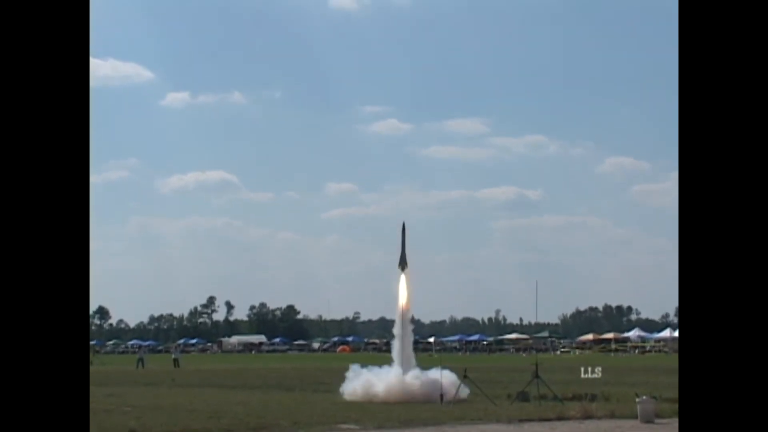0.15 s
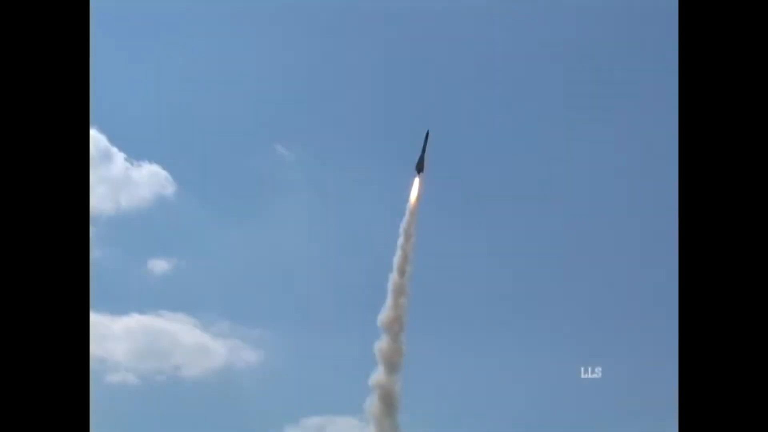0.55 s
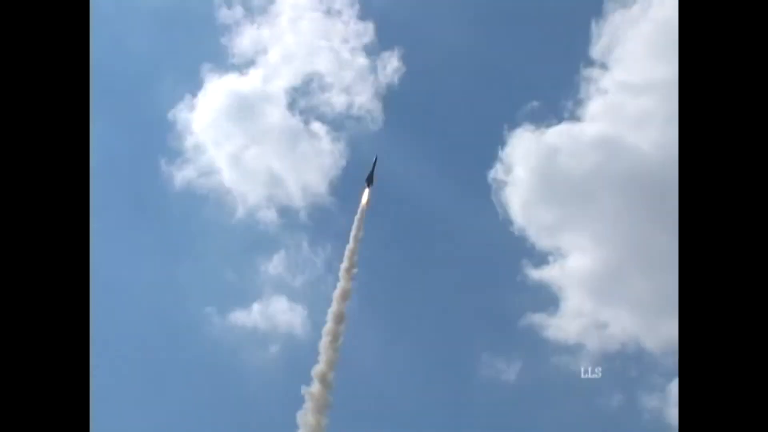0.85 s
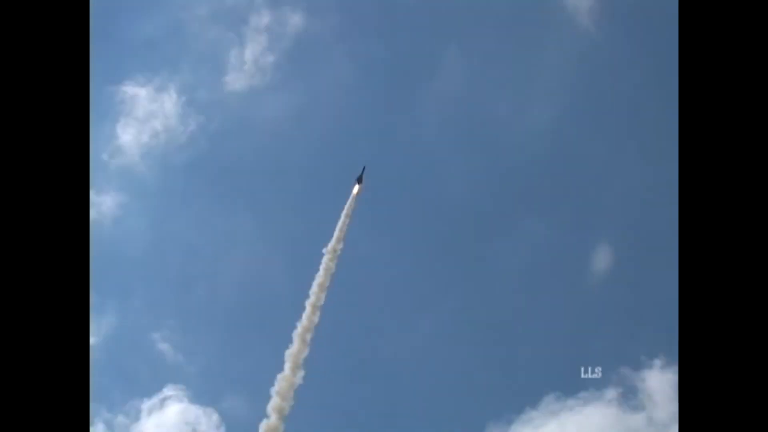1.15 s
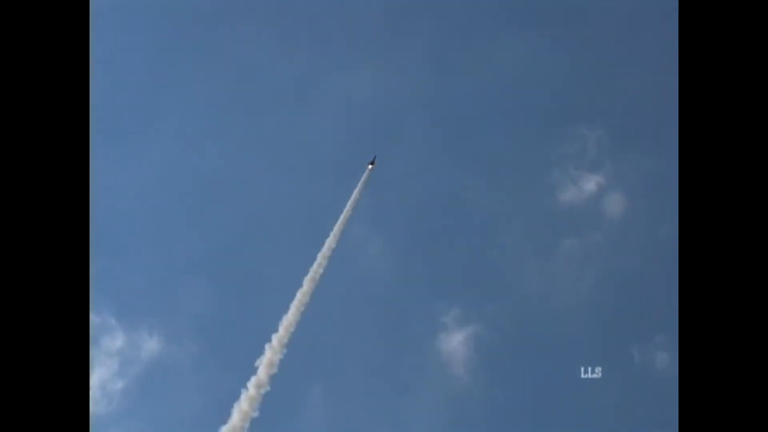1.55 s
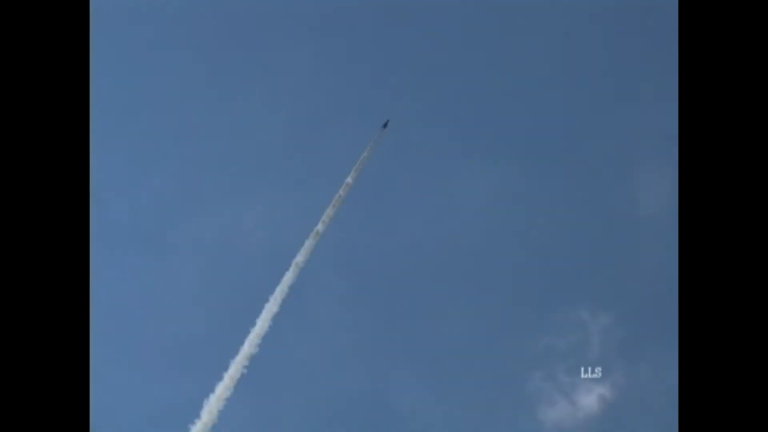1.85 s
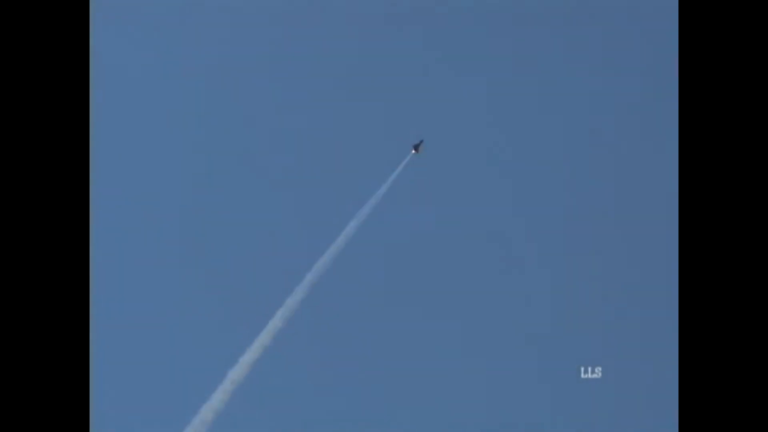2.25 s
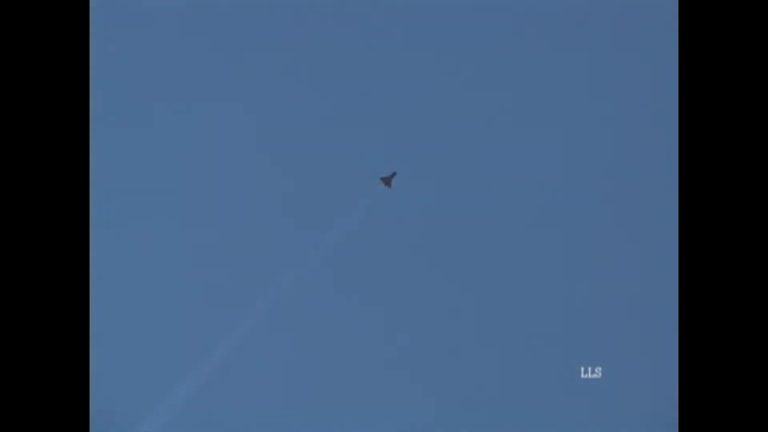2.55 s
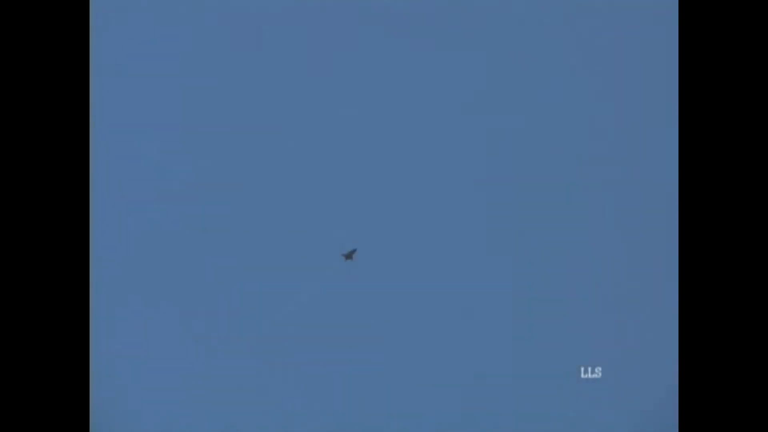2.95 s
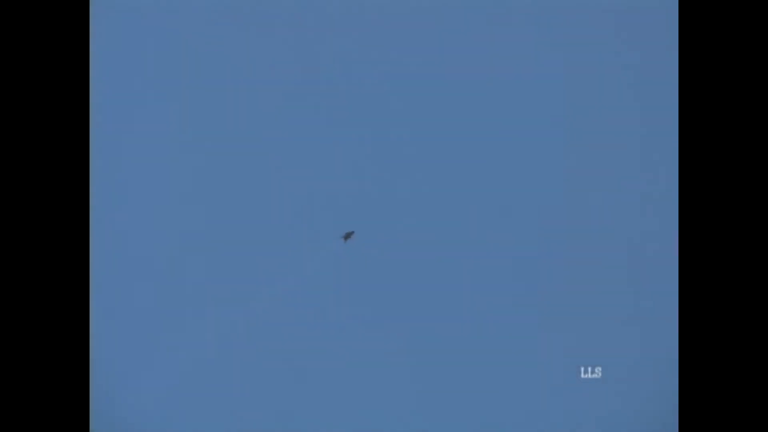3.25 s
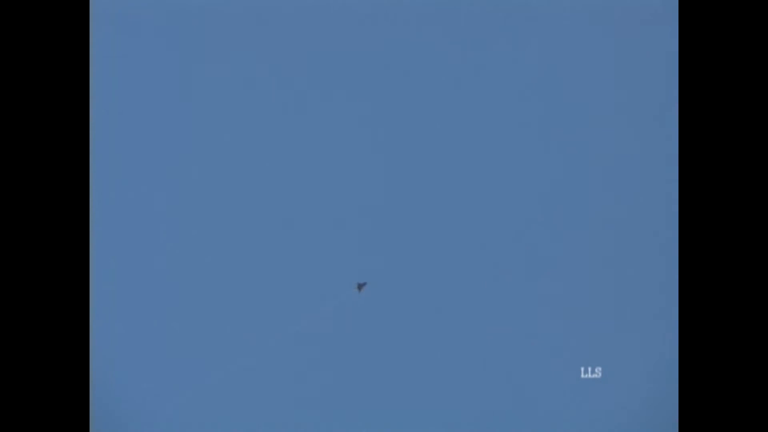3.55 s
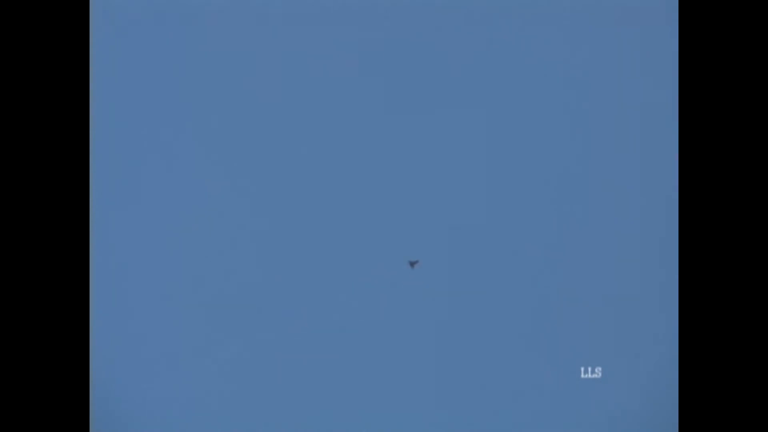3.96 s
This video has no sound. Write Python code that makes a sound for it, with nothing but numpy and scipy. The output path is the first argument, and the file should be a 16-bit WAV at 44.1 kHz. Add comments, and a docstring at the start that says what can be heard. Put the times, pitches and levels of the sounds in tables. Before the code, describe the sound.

A camera microphone outdoors catches a rocket launch: a bang, then a dense tearing jet blast with bright hiss and crackle, overloading at its loudest. The tone turns darker and less hissy as the rocket rises. The motor tails off after about 1.8 seconds, sputtering in separate pops with small echoes. Afterwards it is nearly quiet: a thin, slowly sinking whistle, soft air rush, faint field rumble and light handling knocks.

```python
"""A high-power rocket lights with a bang, roars off its pad and climbs over an open field.
Its jet is noise shaped by thrust and direction, mixed with shocks, that overloads a camera microphone.
The ground reflects the jet a little later as the rocket rises, so a comb sweeps down through the roar.
The motor sputters out in separate pops, some echoed, each an N-wave; the coasting rocket hisses and whistles.
The field is faint coloured noise, and light knocks on the camera are short damped rings."""
import sys
import numpy as np
from scipy import signal
from scipy.fft import rfft, irfft, next_fast_len
from scipy.io import wavfile
from scipy.ndimage import map_coordinates

SR = 44100
rng = np.random.default_rng(int(sys.argv[2]) if len(sys.argv) > 2 else 0)


def master_out(mix):
    """Clip the mix to full scale and print it as 16-bit PCM to the path in sys.argv[1]."""
    frames = np.transpose(np.atleast_2d(mix))
    ceiling = np.clip(frames, -1, 1)
    pcm = np.round(ceiling * 32767).astype(np.int16)
    wavfile.write(sys.argv[1], SR, pcm)


N = 180809
TIME = np.arange(N) / SR  # seconds
# short-time spectra: frames of 512 samples, one every 128
FRAME_S = np.arange(N // 128 + 3)[:, None] * 128 / SR
BIN_HZ = np.fft.rfftfreq(512, 1 / SR)

# The motor's drive: igniter, pressure building, full burn, tail-off, smouldering.
# Each row: time in seconds, level in dB re full burn.
THRUST = [(0, -96), (.056, -77.5), (.068, -25.5), (.13, -21.5), (.19, 0), (.35, -2.5), (.6, -0.5),
          (1.18, -2.5), (1.47, 0.5), (1.53, 0), (1.83, -5.5), (1.96, -8), (2.08, -25.5), (2.19, -19),
          (2.25, -33), (2.55, -37), (2.63, -55), (3.1, -100)]
# Coherence of the rocket's sound at the two microphone ports.
# Each row: frequency in Hz, left-right likeness (0 to 1).
JET_SAME = [(60, 0.41), (150, 0.95), (500, 1), (1000, 1), (2400, 0.88), (6000, 0.9), (9000, 0.83),
            (15000, 0.57)]

# the climb: steady acceleration from a pad some way off
PAD_DISTANCE_M, START_HEIGHT_M, LIFTOFF_S, ACCELERATION_M_PER_S2 = 40, 2.264, 0.1, 78.26
MIC_HEIGHT_M, SOUND_M_PER_S = 2.045, 343
# the roar is beamed backwards: it grows and deepens as the nozzle turns toward the listener
ROAR_DB, ROAR_BEAM_DB = -16.5, 8
SIDE_ON_PITCH, TAIL_ON_PITCH = 1.605, 0.93  # factors on the roar's frequencies
# a weaker jet is deeper too, down to a limit
THRUST_DB_PER_OCTAVE, DEEPEST_THRUST_DB = 39, -27
# the hiss follows only a share of the thrust's swing in dB, and is weaker and duller from behind
HISS_DB, HISS_BEAM_DB, HISS_THRUST_SHARE = -11, -5.5, 0.49
SIDE_ON_TREBLE_DB, TAIL_ON_TREBLE_DB = 2.5, -4
# tilt of the hiss's low end: side on, from behind, and (from behind) its loss per dB of fading thrust
SIDE_ON_BODY_DB, TAIL_ON_BODY_DB, BODY_PER_THRUST = -1, 3, 0.17
FLARE_LEVEL_SHARE = 0.76  # share of a flare that lifts the whole hiss; the treble is lifted further
CHUFF_RISE_S = 0.0021
FIELD_DB = -56  # before slow swells
CUTOFF_HZ = 15700


def gain_of(db):
    """Level to amplitude: 20 dB is a factor of ten in pressure."""
    return 10 ** (np.asarray(db) / 20)


def evened(x):
    """Normalises mean-square pressure: scales to rms 1."""
    return x / np.sqrt(np.mean(x ** 2) + 1e-20)


def read(points, hz):
    """Spectral interpolation: straight lines on a log-frequency axis."""
    f, value = np.transpose(points)
    return np.interp(np.log(hz + 1), np.log(f + 1), value)


def follow(rows, t, column=1):
    """Linear interpolation in time of one column of a curve."""
    rows = np.asarray(rows)
    return np.interp(t, rows[:, 0], rows[:, column])


def add(mix, s, sound):
    """Superposition: adds a sound to the mix, starting at s seconds."""
    part = mix[max(round(s * SR), 0):][:len(sound)]
    part += sound[:len(part)]


def filtered(x, response):
    """Linear filtering: multiplies the spectrum by a function of frequency."""
    size = next_fast_len(N + SR // 2)
    spectrum = rfft(x, size) * response(np.fft.rfftfreq(size, 1 / SR))
    return irfft(spectrum, size)[..., :N]


def lowpass(x, hz, order=2):
    """Causal Butterworth low-pass: maximally flat below its corner."""
    sections = signal.butter(order, min(hz, 0.45 * SR), fs=SR, output="sos")
    return signal.sosfilt(sections, x)


def pair(same):
    """Partial coherence: white noise at two ports, sharing one part and differing in the rest."""
    left, other = rng.standard_normal((2, N))
    likeness = lambda hz: np.clip(read(same, hz), 0, 1)
    shared = filtered(left, likeness)
    separate = filtered(other, lambda hz: np.sqrt(1 - likeness(hz) ** 2))
    return np.array([left, shared + separate])


def coloured(x, db, band):
    """Time-varying filtering: noise takes a moving spectrum (frames x bins, dB), rms 1 inside the band."""
    gain = gain_of(db)
    inside = (BIN_HZ >= band[0]) & (BIN_HZ <= band[1])
    gain = gain / np.sqrt(np.mean(gain ** 2 * inside, axis=1, keepdims=True))
    z = signal.stft(x, nperseg=512, noverlap=384)[2]
    shaped = z * gain[:z.shape[-1]].T
    return signal.istft(shaped, nperseg=512, noverlap=384)[1][:, :N]


def wander(hz):
    """Band-limited random modulation: low-passed noise of rms 1, falling off steeply above hz."""
    return evened(filtered(rng.standard_normal(N), lambda f: 1 / (1 + (f / hz) ** 4)))


def placed(x, side):
    """Interaural level difference: side is left minus right in dB, frequency by frequency."""
    return filtered(x, lambda hz: gain_of(np.outer([0.5, -0.5], read(side, hz))))


def field(swell_db=2.0):
    """Ambient noise: random pressure, spectrally shaped, is the faint rumble and hiss of the open field."""
    # Each row: frequency in Hz, relative spectral level in dB.
    field_colour = [(12, -21.5), (25, -9), (80, -4), (140, -9.5), (220, -11.5), (350, -16.5), (550, -16),
                    (1100, -14.5), (1400, -21), (2000, -21), (3500, -33.5), (6000, -37.5), (15500, -40)]
    # Each row: frequency in Hz, left-right likeness (negative counts as 0).
    field_same = [(60, 0.43), (180, 0.21), (550, 0.22), (1650, 0.42), (4970, 0.43), (15000, -0.03)]
    # Each row: frequency in Hz, left minus right in dB.
    field_side = [(60, -0.5), (180, -1), (550, -4), (1650, -1), (4970, 0.5), (15000, -0.5)]
    air = evened(filtered(pair(field_same), lambda hz: gain_of(read(field_colour, hz))))
    return placed(air, field_side) * gain_of(FIELD_DB + swell_db * wander(hz=10))


def flight(t):
    """Spherical spreading: sine of the rocket's elevation, and its distance loss in dB re the pad."""
    height = START_HEIGHT_M + ACCELERATION_M_PER_S2 * np.maximum(t - LIFTOFF_S, 0) ** 2 / 2
    distance = np.hypot(height, PAD_DISTANCE_M)
    return height / distance, 20 * np.log10(distance / PAD_DISTANCE_M)


def turned(t, side_on, tail_on, power):
    """Directivity: moves between two values as the climbing rocket turns its nozzle toward the listener."""
    return side_on + (tail_on - side_on) * flight(t)[0] ** power


def turbulence(share, per_s):
    """Jet mixing noise: white noise at both ports, with a share of its power in separate shocks."""
    shocks = (rng.random(N) < per_s / SR) * rng.uniform(0.5, 1, N)
    shocks = -signal.hilbert(shocks).imag  # each one pushes, then pulls
    share = np.clip(share, 0, 1)
    return np.sqrt(1 - share) * pair(JET_SAME) + np.sqrt(share) * evened(shocks)


def chuffs():
    """Unsteady mass flow: power of gas puffs that each rise quickly, hold and decay exponentially."""
    # Puffs as the motor lights and as it burns out.
    # Each row: start in seconds, hold in seconds from the start, level in dB, t60 in seconds.
    chuff_rows = [(0, 0.073, -49.5, .1), (.066, .008, -12.5, 0.17), (0.084, 0.012, -8.5, 1.11),
                  (1.99, .135, -25.5, 0.059), (2.414, 0.013, -45, 0.11), (2.658, 0.013, -51.5, 1.24)]
    power = np.zeros(N)
    for start, hold, db, t60 in chuff_rows:
        age = TIME - start
        rise = np.clip(age / CHUFF_RISE_S, 0, 1)
        power += (rise * gain_of(db - 60 * np.maximum(age - hold, 0) / t60)) ** 2
    return power


def roar(shocks_per_s=420, flutter_db=0.34):
    """Large-eddy jet noise: turbulence and shocks whose spectrum shifts with thrust and direction."""
    # Crackle of the jet. Each row: time in seconds, share of the drive's power in shocks (0 to 1).
    crackle_share = [(0, 0.57), (.3, 0.28), (1.4, 0), (1.8, 0.55), (2.1, 0.72), (2.25, 0.01), (2.8, 0.32)]
    # Each row: frequency in Hz before the pitch factor, relative spectral level in dB.
    roar_colour = [(20, -29.5), (70, -30), (130, -15.5), (200, -13), (350, -4), (550, 1.5), (850, 1.5),
                   (1250, -2.5), (1800, -6.5), (2800, -15), (5000, -32), (12000, -78)]
    # Slow swells of the roar. Each row: time in seconds, change of level in dB.
    roar_swell = [(.28, 0), (.38, 3), (.5, 1), (.57, -3.5), (.73, -3.5), (.78, 0), (1.05, 2.5), (1.48, -1),
                  (1.9, -1)]
    drive = turbulence(follow(crackle_share, TIME), shocks_per_s)
    octaves = np.maximum(follow(THRUST, FRAME_S), DEEPEST_THRUST_DB) / THRUST_DB_PER_OCTAVE
    pitch = turned(FRAME_S, SIDE_ON_PITCH, TAIL_ON_PITCH, power=1.7) * 2 ** octaves
    jet = coloured(drive, read(roar_colour, BIN_HZ / pitch), band=(200, 1500))
    beam_db = turned(TIME, 0, ROAR_BEAM_DB, power=1.2)
    burn_db = ROAR_DB + follow(THRUST, TIME) + beam_db - flight(TIME)[1]
    strength = np.sqrt(gain_of(burn_db) ** 2 + chuffs())  # powers add
    return jet * strength * gain_of(follow(roar_swell, TIME) + flutter_db * wander(hz=35.2))


def flares(t):
    """Amplitude modulation: brief Gaussian rises of the hiss, in dB at the times t."""
    # Each row: time of the top in seconds, time to fall to 1/e in seconds, height in dB.
    flare_rows = [(0.235, 0.023, 2.5), (0.417, 0.02, 2.5), (0.522, 0.015, 2), (0.707, 0.065, 2.5),
                  (1.316, 0.014, 3.5), (1.443, 0.022, 4), (1.555, .012, 2.5), (1.957, 0.0085, 2.5),
                  (2.178, 0.026, 1)]
    return sum(db * np.exp(-((t - s) / half) ** 2) for s, half, db in flare_rows)


def hiss(flutter_db=0.73, knee_hz=5000, treble_hz=8200, shimmer_db=0.58, body_hz=2200,
         steepness=0.8, crackle=0.11, shocks_per_s=800):
    """Fine-scale jet noise: small eddies radiate high, with less treble as the nozzle turns to the listener."""
    # Each row: frequency in Hz, relative spectral level in dB.
    hiss_colour = [(300, -29.5), (900, -11.5), (1600, -2), (2100, -2), (2400, -1), (2850, 3), (3450, -3),
                   (4300, -1), (5500, -6), (7000, -12.5), (8800, -17), (10500, -26.5), (15500, -40.5)]
    # 0 up to the knee, 1 at the treble frequency, more above it
    reach = (np.maximum(BIN_HZ - knee_hz, 0) / (treble_hz - knee_hz)) ** steepness
    shimmer = flares(FRAME_S) + shimmer_db * np.interp(FRAME_S, TIME, wander(hz=21.88))
    treble_db = turned(FRAME_S, SIDE_ON_TREBLE_DB, TAIL_ON_TREBLE_DB, power=2.1)
    air_db = np.minimum(treble_db * reach, 5) + shimmer * np.minimum(reach, 1)
    tail_body_db = TAIL_ON_BODY_DB + BODY_PER_THRUST * follow(THRUST, FRAME_S)
    low_db = turned(FRAME_S, SIDE_ON_BODY_DB, tail_body_db, power=3.3)
    colour_db = read(hiss_colour, BIN_HZ) + air_db + low_db / (1 + (BIN_HZ / body_hz) ** 6)
    jet = coloured(turbulence(crackle, shocks_per_s), colour_db, band=(2500, 6000))
    beam_db = turned(TIME, 0, HISS_BEAM_DB, power=1.4)
    burn_db = HISS_DB + HISS_THRUST_SHARE * follow(THRUST, TIME) + beam_db - flight(TIME)[1]
    return jet * gain_of(burn_db + FLARE_LEVEL_SHARE * flares(TIME) + flutter_db * wander(hz=59))


def pops(edge_hz=2700):
    """N-wave: a jump in pressure, a ramp down into suction, and a jump back, with softened edges."""
    # Single shocks from the motor, with some late echoes of the pops near 2.43 s.
    # Each row: start in seconds, jump in dB before the edges are softened, length in milliseconds.
    shock_rows = [(0.069, 1, 1.8), (0.0743, 7, 0.69), (0.0733, -7, 3.6), (.109, -8.5, 4.3),
                  (1.4875, -0.5, 1.2), (2.095, -17, 1.3), (2.157, -15.5, 1.2), (2.1634, -22, 0.72),
                  (2.179, -15, 0.75), (2.1825, -20, 0.52), (2.19, -14.5, 1.16), (2.227, -17, 1.1),
                  (2.415, -24.5, 0.78), (2.4254, -25, 1.15), (2.4369, -38, 1), (2.4485, -33, 0.81),
                  (2.461, -34, 1.6), (2.6605, -34, 0.91)]
    out, t = np.zeros(N), np.arange(SR // 40) / SR
    for s, db, ms in shock_rows:
        u = t * 1000 / ms  # 0 to 1 along the wave
        add(out, s, gain_of(db) * (1 - 2 * u) * (u < 1))
    return lowpass(out, edge_hz)


def ignition(start_s=0.078, db=-14, t60=0.1, top_hz=280, bottom_hz=150):
    """Impinging flow: the first gas hits the blast plate with a short boom of decaying low noise."""
    age = TIME - start_s
    boom = lowpass(rng.standard_normal(N), top_hz)
    boom = filtered(boom, lambda hz: hz ** 2 / (hz ** 2 + bottom_hz ** 2))
    return evened(boom) * (age > 0) * gain_of(db - 60 * abs(age) / t60)


def over_ground(x, reflection=0.53, grass_hz=2900, full_lag_s=0.0033):
    """Two-path interference: a duller bounce off the grass, weak while the rocket is low, later as it rises."""
    lag_s = 2 * MIC_HEIGHT_M * flight(TIME)[0] / SOUND_M_PER_S
    dulled = filtered(x, lambda hz: 1 / np.sqrt(1 + (hz / grass_hz) ** 4))
    bounce = np.array([map_coordinates(side, [(TIME - lag_s) * SR], order=3) for side in dulled])
    return x + reflection * np.minimum(lag_s / full_lag_s, 1) * bounce


def housing(hz):
    """Resonance and phase lead: the ports' fixed ripples for sound from the sky; the left hears it first."""
    # Peaks and dips of the microphone housing.
    # Each row: centre in Hz, width in Hz, height of this one peak or dip in dB.
    ripples = [(170, 70, 2), (520, 70, 2), (620, 90, -1.5), (1250, 160, 2.5), (1480, 160, -2.5),
               (1690, 150, 3), (2330, 180, 2), (2600, 160, -2), (3250, 200, 1.5), (3880, 160, 2),
               (4570, 200, 1.5), (5120, 200, -2), (6860, 160, 2.5), (7950, 300, -2.5)]
    # Each row: frequency in Hz, radians by which the left leads.
    jet_phase = [(20, 0.02), (500, 0.4), (1200, 0.28), (2400, 0.42), (6000, .1), (10000, .3), (15000, 0.17)]
    ripple_db = sum(db / (1 + (2 * (hz - centre) / width) ** 2) for centre, width, db in ripples)
    return gain_of(ripple_db) * np.exp(1j * np.outer([0.5, -0.5], read(jet_phase, hz)))


def coast(waver=0.00178, unsteady=0.48, unsteady_hz=40):
    """Aeolian tone: an edge on the rocket whistles in rushing air; the pitch sinks as it slows."""
    # Air over the coasting rocket, levels before the microphone's response.
    # Each row: time in seconds, whistle pitch in Hz, whistle level in dB, rush level in dB.
    air_rows = [(2.2, 2748, -66, -56), (2.5, 2563, -59, -60), (2.82, 2440, -66.5, -63.5),
                (3.06, 2400, -62, -55.5), (3.18, 2376, -64, -59), (3.35, 2370, -64.5, -59.5),
                (3.48, 2326, -64, -58), (3.57, 2300, -73, -65.5), (3.93, 2260, -83, -72.5),
                (4.09, 2230, -69, -61)]
    # Each row: frequency in Hz, relative spectral level in dB.
    rush_colour = [(400, -23), (1200, -18), (1950, -21), (2400, 3), (2950, 0), (3450, -13), (4200, -15),
                   (5500, -34), (10000, -42)]
    pitch = follow(air_rows, TIME) * (1 + waver * wander(hz=6.2))
    # complex noise makes both strength and phase of the tone fluctuate
    strength = 1 + unsteady * (wander(unsteady_hz) + 1j * wander(unsteady_hz))
    tone = np.exp(2j * np.pi * np.cumsum(pitch) / SR)
    whistle = evened((strength * tone).real)
    rush = evened(filtered(pair(JET_SAME), lambda hz: gain_of(read(rush_colour, hz))))
    whistle = whistle * gain_of(follow(air_rows, TIME, column=2))
    rush = rush * gain_of(follow(air_rows, TIME, column=3))
    return (whistle + rush) * (TIME > air_rows[0][0])


def knocks(rise_s=0.00058, rebound_s=0.0092, rebound_db=-13, left_db=-12.5):
    """Damped resonance: a tick and a hollow ring of the camera's case, two rebounds, nearer the right port."""
    # Each row: start in seconds, level in dB, pitch in Hz, ring t60 in seconds, tick in dB re the knock.
    knock_rows = [(3.0634, -25.5, 485, 0.019, -17), (3.455, -40, 525, 0.02, -2),
                  (3.913, -24.5, 545, 0.014, -19), (4.0745, -37.5, 747, 0.01, -5)]
    out, t = np.zeros(N), np.arange(SR // 12) / SR
    for s, db, hz, t60, tick_db in knock_rows:
        rise = 1 - np.exp(-(t / rise_s) ** 2)
        ring = -np.sin(2 * np.pi * hz * t) * rise * gain_of(-60 * t / t60)
        tick = evened(lowpass(rng.standard_normal(len(t)), hz=2630, order=2)) * np.exp(-t / 0.0018)
        knock = gain_of(db) * (2 * ring + gain_of(tick_db) * tick)
        for k in range(3):  # the knock and its rebounds
            add(out, s + k * rebound_s, gain_of(k * rebound_db) * knock)
    return np.array([gain_of(left_db) * out, out])


def scene():
    """Superposition: the rocket over reflecting ground, the field and the camera's knocks."""
    # Each row: frequency in Hz, left minus right in dB.
    jet_side = [(60, 0), (130, -2), (300, -0.3), (640, 0.3), (1400, 0.5), (2500, 2.3), (4000, 4),
                (7000, 1.3), (15000, 0)]
    motor = roar() + hiss() + pops() + ignition()
    rocket = over_ground(motor) + coast()
    return field() + filtered(placed(rocket, jet_side), housing) + knocks()


def record(dry, hardness=6.5):
    """Saturation: the input rounds off the loudest peaks at full scale; then the band limit."""
    rounded = dry / (1 + abs(dry) ** hardness) ** (1 / hardness)
    band_limit = signal.firwin(511, CUTOFF_HZ, window=("kaiser", 9), fs=SR)
    return signal.oaconvolve(rounded, band_limit[None], "same")


dry = scene()
out = record(dry)
master_out(out)
```